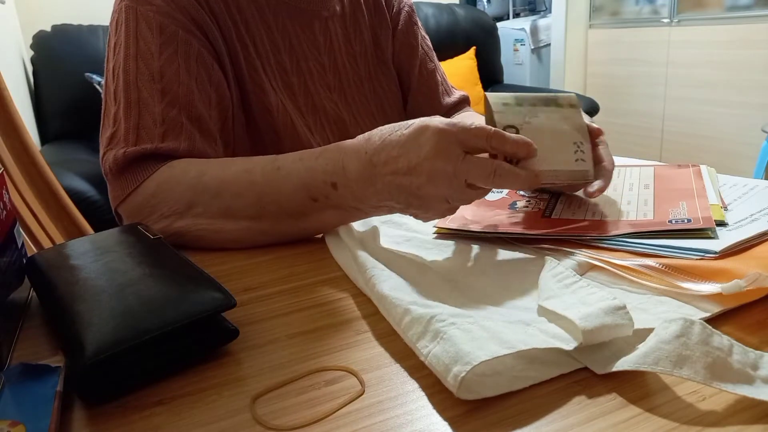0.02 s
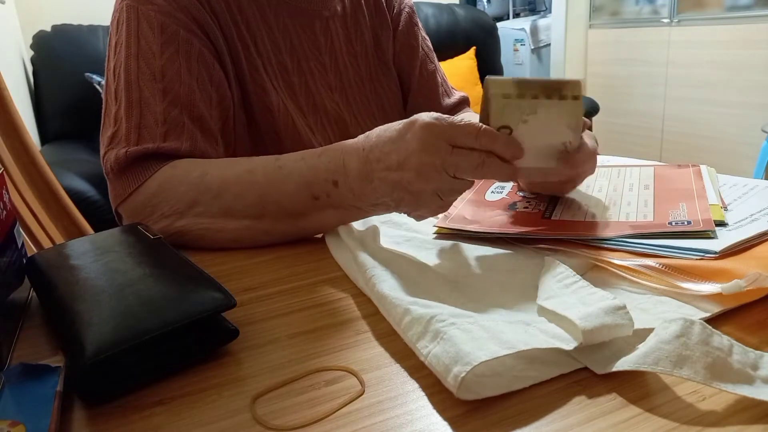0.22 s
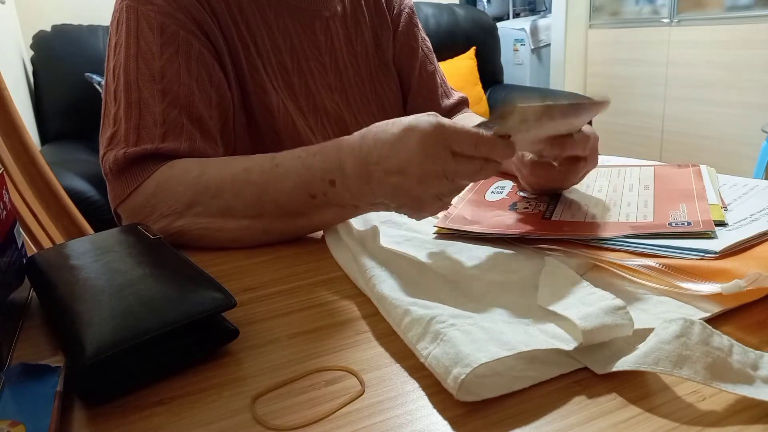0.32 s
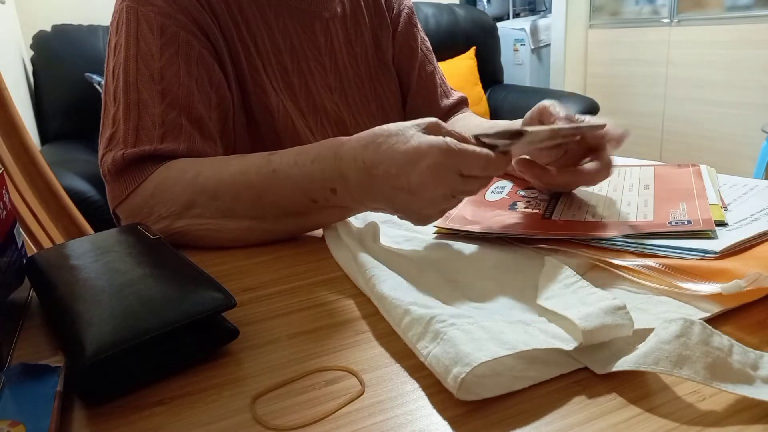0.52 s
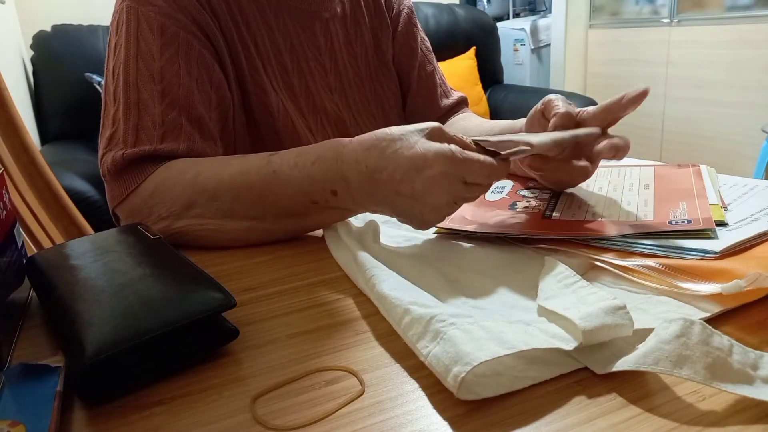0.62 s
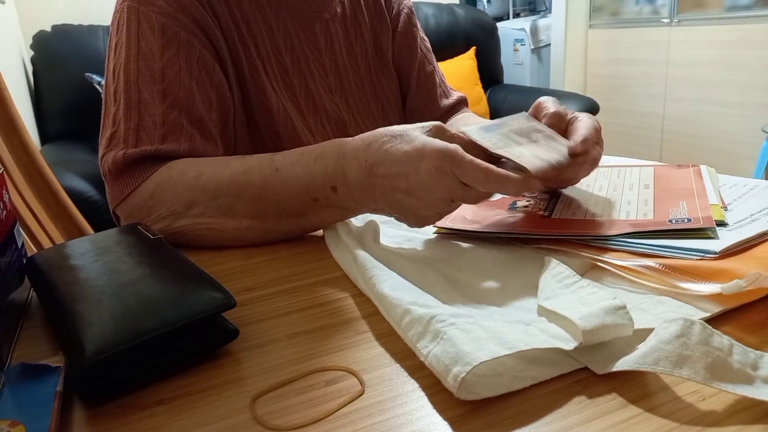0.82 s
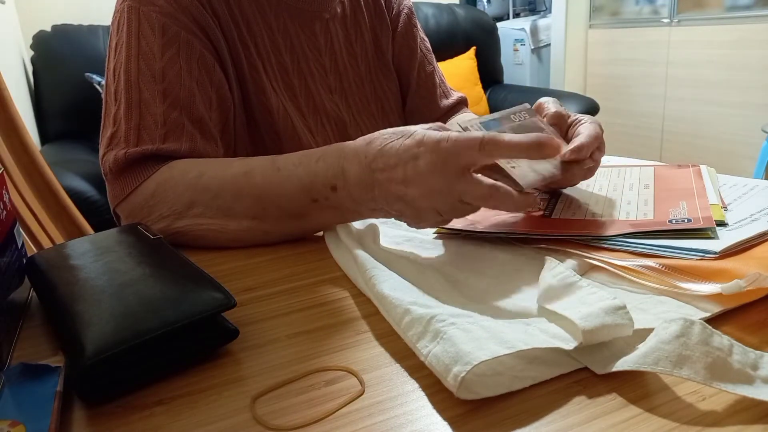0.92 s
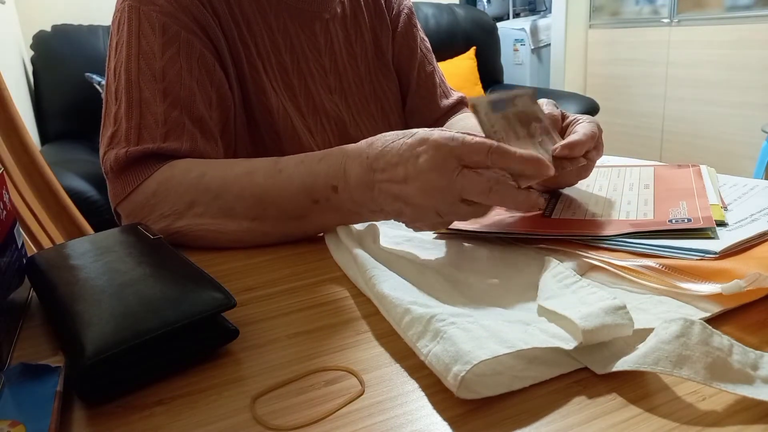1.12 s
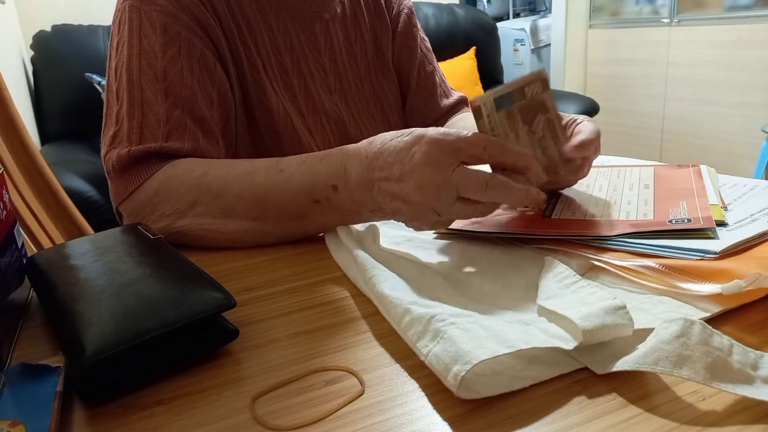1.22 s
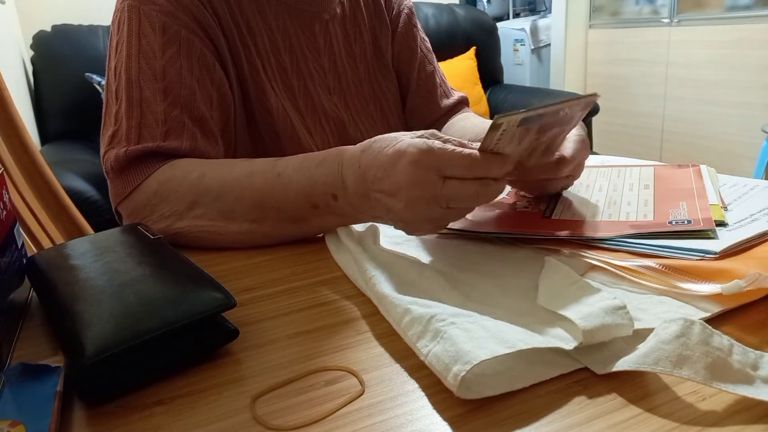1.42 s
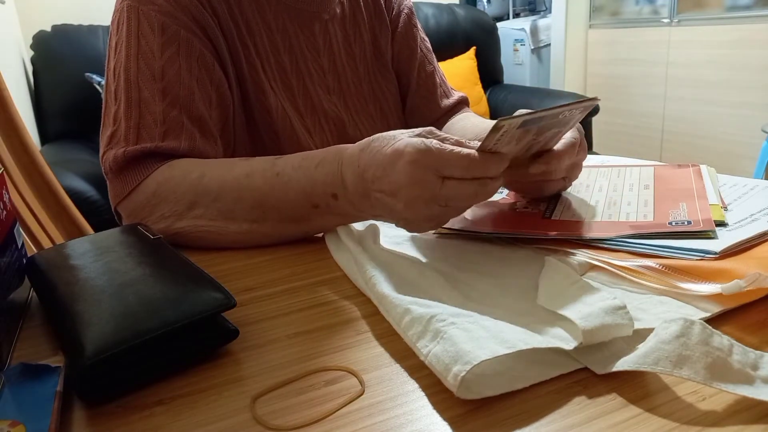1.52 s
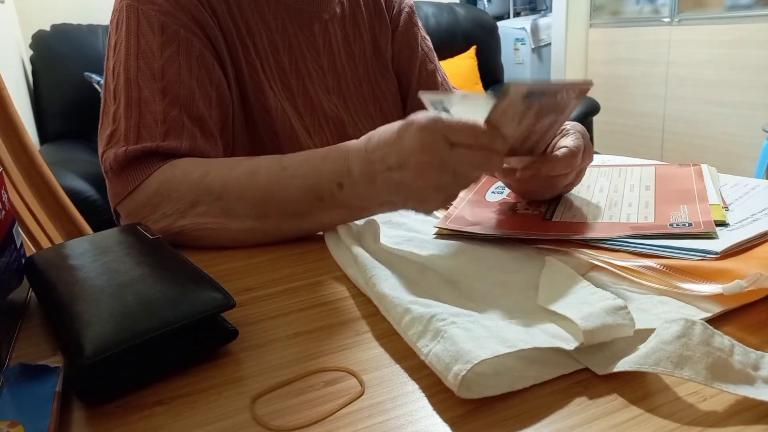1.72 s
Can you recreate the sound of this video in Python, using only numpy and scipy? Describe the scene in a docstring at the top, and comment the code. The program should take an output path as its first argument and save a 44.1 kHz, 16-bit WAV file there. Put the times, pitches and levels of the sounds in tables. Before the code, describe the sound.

Banknotes are counted by hand in a small room: light rustles and flicks, one hard snap with smaller slaps after it, then faint ticks and quiet; close stereo microphone, notes slightly left, low rumble and thin hiss.

```python
"""Banknotes are counted by hand in a small room, left of a stereo microphone, over low rumble and thin hiss.
Creases snap and slap on the wad, hardest after a third of a second: struck resonances plus torn-edge noise.
Between them notes slide with a fine crackle of random grains; the room answers with echoes and diffuse tails.
Light fingernail ticks ring and ping before the last two snaps, and the sliding dies away.
Near the end one faint whistle rises, a gliding sine on slow noise, and a narrow sizzle of noise returns."""
import sys
import numpy as np
from scipy import signal
from scipy.fft import rfft, irfft, next_fast_len
from scipy.io import wavfile
from scipy.ndimage import uniform_filter1d

SR = 44100
rng = np.random.default_rng(int(sys.argv[2]) if len(sys.argv) > 2 else 0)


def waveform_to_disk(signal):
    """Save audio, clipped to [-1, 1], as 16-bit WAV at the path in sys.argv[1]."""
    frames = np.transpose(np.atleast_2d(signal))
    scaled = np.clip(frames, -1, 1) * 32767
    samples = np.round(scaled).astype(np.int16)
    wavfile.write(sys.argv[1], SR, samples)


def ratio_of_db(decibels):
    """Turn decibels (scalar or array-like) into linear amplitude factors; 0 dB maps to 1."""
    return 10 ** (np.asarray(decibels, float) / 20)


N = 79380  # samples

# slap of the notes' flat side: (frequency [Hz], width [Hz], level [dB])
THUD_PEAKS = [(219, 140, 0), (497, 320, -2)]
CRACK_RIGHT_DB = -4  # right port against left
RING_OFFSET_DB = 9.5  # added to the ring levels of snaps and ticks
FLEX_LAG_S, TEAR_DECAY_S = .0025, .0023  # the wad flexes most this long after the edge tears


def unit(x):
    """Scale to rms 1."""
    return x / np.sqrt(np.mean(x ** 2) + 1e-20)


def along(points, hz):
    """Interpolate (frequency [Hz], value) points on a log axis."""
    point_hz, value = np.transpose(points)
    return np.interp(np.log(hz + 1), np.log(point_hz + 1), value)


def curves(rows):
    """One value per sample for each column after the time."""
    time_s, *columns = np.transpose(rows)
    return [np.interp(np.arange(N) / SR, time_s, column) for column in columns]


def filtered(x, response):
    """Multiply the spectrum of x by a complex response of frequency."""
    size = next_fast_len(x.shape[-1] + SR // 4)
    spectrum = rfft(x, size) * response(np.fft.rfftfreq(size, 1 / SR))
    return irfft(spectrum, size)[..., :x.shape[-1]]


def resonant(peaks):
    """Causal response of parallel resonances with alternating sign."""
    def response(f):
        total = 0
        for k, (centre_hz, width_hz, db) in enumerate(peaks):
            damping = 1j * f * width_hz
            total = total + (-1) ** k * ratio_of_db(db) * damping / (centre_hz ** 2 - f ** 2 + damping)
        return total
    return response


def causal(points):
    """Minimum-phase response with the given colour, by folding the cepstrum."""
    def response(f):
        cepstrum = irfft(np.log(ratio_of_db(along(points, f))))
        cepstrum[1:len(cepstrum) // 2] *= 2
        cepstrum[len(cepstrum) // 2 + 1:] = 0
        return np.exp(rfft(cepstrum))
    return response


def stereo(pair, alike, colour=((0, 0),)):
    """Two independent noises as mid and side, weighted for a left-right likeness at each frequency."""
    def response(f):
        angle = np.arccos(np.clip(along(alike, f), -1, 1)) / 2
        return ratio_of_db(along(colour, f)) * np.array([np.cos(angle), np.sin(angle)])
    mid, side = filtered(pair, response)
    return np.array([mid + side, mid - side])


def rush(colour, alike, patchy_db):
    """Stereo noise of rms 1 with time-frequency patches of random gain."""
    z = signal.stft(rng.standard_normal((2, N)), nperseg=1024)[2]
    field = uniform_filter1d(rng.standard_normal(z.shape[1:]), size=4, axis=0)
    field = uniform_filter1d(field, size=4, axis=1)
    pair = signal.istft(z * ratio_of_db(patchy_db * unit(field)), nperseg=1024)[1][:, :N]
    return unit(stereo(pair, alike, colour))


def rumble():
    """Low coloured noise whose level swells and sinks, much alike in both ports at the bottom."""
    # (time [s], level [dB])
    rumble_level = [(0, -58.5), (.07, -43.5), (.17, -52), (.23, -44), (.3, -67), (.34, -41.5), (.42, -34.5),
                    (.51, -55), (.77, -58.5), (.9, -50.5), (1.0, -55), (1.1, -53.5), (1.4, -57),
                    (1.65, -55.5), (1.8, -54.5)]
    # (frequency [Hz], relative density [dB per Hz])
    rumble_colour = [(15, -63.5), (25, -78.5), (43, -12), (52, -35), (72, -1), (118, -12), (184, -5.5),
                     (243, -9), (264, -15.5), (354, -12), (700, -36), (910, -80), (1540, -120)]
    # (frequency [Hz], left-right likeness [0..1])
    rumble_alike = [(60, 0.8), (130, 1), (290, 0.83), (640, .12)]
    return ratio_of_db(curves(rumble_level)[0]) * rush(rumble_colour, rumble_alike, patchy_db=1.5)


def hiss():
    """Steady microphone noise, almost independent in the two ports."""
    # (frequency [Hz], relative density [dB per Hz])
    hiss_colour = [(400, -7), (700, -12), (900, -4.5), (3500, -18.5), (5000, -19), (6500, -25),
                   (8500, -26.5), (14800, -18), (15400, -30.5), (15800, -47.5)]
    level_db = -78
    return ratio_of_db(level_db) * rush(hiss_colour, [(1000, .02)], patchy_db=-0.1)


def sizzle():
    """A narrow hiss that comes and goes: noise passed twice through one resonance."""
    # (time [s], relative level [dB])
    sizzle_level = [(0, -75), (.65, -78.5), (1.2, -84), (1.5, -100), (1.6, -94), (1.7, -84), (1.8, -88)]
    centre_hz, single_pass_width_hz, offset_db = 6400, 1700, 4
    narrow = resonant([(centre_hz, single_pass_width_hz, 0)])
    noise = filtered(rng.standard_normal((2, N)), lambda f: narrow(f) ** 2)
    return ratio_of_db(curves(sizzle_level)[0] + offset_db) * unit(noise)


def whistle():
    """A faint rising sine, its amplitude wavering with slow noise."""
    # (time [s], frequency [Hz], level [dB])
    whistle_glide = [(1.45, 3650, -110), (1.49, 3796, -85), (1.55, 4070, -88), (1.58, 4140, -110)]
    hz, level_db = curves(whistle_glide)
    breath = unit(uniform_filter1d(rng.standard_normal((2, N)), size=150, axis=1))
    return ratio_of_db(level_db) * breath * np.sin(2 * np.pi * np.cumsum(hz) / SR)


def room(x):
    """A dull echo 3.75 ms late colours each sound; near walls add two later dull echoes; a diffuse tail
    follows, each frequency dying at its own speed."""
    # (frequency [Hz], 60 dB decay time [s])
    decay_times = [(100, 0.68), (250, 0.61), (450, 0.58), (800, 0.27), (2500, 0.34), (6000, 0.31),
                   (14000, 0.2)]
    # (frequency [Hz], level [dB])
    tail_colour = [(100, 5), (400, -1.5), (900, -6), (1250, 5), (1800, -16.5), (2300, 4), (3300, -2.5),
                   (6300, -1.5), (14000, 0)]
    # (frequency [Hz], left-right likeness [0..1])
    tail_alike = [(60, 0.38), (150, 1), (300, 1), (600, 0.011)]
    # (delay [s], left level [dB], right level [dB]); the shortest colours the sound, the other two come from
    # near walls
    dull_echoes = [(.00375, -9, -9), (.0105, -14, -12), (.0145, -7, -13)]
    tail_db, right_db = -4.5, -0.5  # tail before colouring; right against left
    gap_s, rise_s = 0.009, 0.002
    echo_dull_hz = 6100

    hz, t, z = signal.stft(rng.standard_normal((2, SR * 3 // 4)), SR, nperseg=256)
    tail = signal.istft(z * ratio_of_db(-60 * t / along(decay_times, hz)[:, None]), SR, nperseg=256)[1]
    tail = tail * (1 - np.exp(-np.arange(tail.shape[1]) / SR / rise_s))
    tail = filtered(ratio_of_db(tail_db) * tail / np.linalg.norm(tail[0]), causal(tail_colour))
    tail = stereo(tail, tail_alike) * ratio_of_db([[0], [right_db]])
    tail = np.pad(tail, ((0, 0), (round(gap_s * SR), 0)))

    # the left port drives the tail at the rms of both
    drive = unit(x[0])[None] * np.sqrt(np.mean(x ** 2))
    wet = signal.fftconvolve(drive, tail, axes=1)[:, :N]
    dull = filtered(x, lambda f: 1 / (1 + 1j * f / echo_dull_hz))
    for delay_s, echo_left_db, echo_right_db in dull_echoes:
        echo = np.pad(dull, ((0, 0), (round(delay_s * SR), 0)))[:, :N]
        wet += ratio_of_db([[echo_left_db], [echo_right_db]]) * echo
    return wet


def paper(ring, thud, crack, air):
    """Forces on the notes sound through the wad's resonances; the right port hears them later."""
    # ring of the wad at each port: (frequency [Hz], width [Hz], level [dB])
    wad_left = [(811, 350, 0), (1317.6, 560, 5), (1584, 280, 4.5)]
    wad_right = [(713, 200, -5), (1070, 1300, -10), (1310, 780, -7.5)]
    # middle and top noise: (frequency [Hz], level [dB])
    crack_colour = [(1100, -2.5), (1500, 7), (1900, -7), (2300, 2), (3000, -2), (3700, 4.5), (4600, -6),
                    (6300, -3), (7300, -14.5), (9000, -24.5)]
    air_colour = [(2800, -11), (4500, -3.5), (6200, 1), (7200, -5.5), (8400, -11.5), (10000, -3),
                  (12000, 0.5), (13500, -9), (15000, -3), (15500, -29), (16500, -25)]
    thud_left_db, thud_right_db, air_right_db = -3, 3, -8
    right_lag_s, soft_hz = .00044, 2200

    ring = filtered(ring, lambda f: 1 / (1 + 1j * f / soft_hz) ** 2)
    thud = filtered(thud, resonant(THUD_PEAKS))
    crack = filtered(crack, causal(crack_colour))
    air = filtered(air, causal(air_colour))
    left = filtered(ring, resonant(wad_left)) + ratio_of_db(thud_left_db) * thud + crack + air
    right = filtered(ring, resonant(wad_right)) + ratio_of_db(thud_right_db) * thud
    right = right + ratio_of_db(CRACK_RIGHT_DB) * crack + ratio_of_db(air_right_db) * air
    return np.array([left, filtered(right, lambda f: np.exp(-2j * np.pi * f * right_lag_s))])


def sliding():
    """Notes slide over one another: dense tiny grains into the wad's resonances."""
    # (time [s], relative level [dB])
    slide_level = [(0, -66.5), (.04, -73.5), (.06, -51.5), (.17, -61), (.2, -40.5), (.32, -54),
                   (.35, -43.5), (.375, -51.5), (.4, -39), (.48, -53.5), (.56, -80.5), (.59, -54),
                   (.7, -83), (1.04, -73), (1.07, -65), (1.25, -103)]
    grains_per_s, grain_spread_db = 2500, 4
    offset_db, ring_db, thud_db, crack_db = -0.5, 11.5, 15.5, 1.5  # the last three against the air
    level_db, = curves(slide_level)
    hit = rng.random(N) < grains_per_s / SR
    sizes = ratio_of_db(grain_spread_db * rng.standard_normal(N))
    grains = hit * sizes * rng.choice([-1, 1], N)
    active = np.arange(N) < slide_level[-1][0] * SR
    force = ratio_of_db(level_db + offset_db) * unit(grains) * active
    return paper(ratio_of_db(ring_db) * force, ratio_of_db(thud_db) * force, ratio_of_db(crack_db) * force, force)


def ticks():
    """Light contacts of a fingernail on an edge: a clean short ring, a little crack and one narrow ping."""
    # (time [s], relative ring [dB], relative ping [dB], ping frequency [Hz])
    tick_events = [(0.8743, -46, -42, 2270), (.881, -41, -38, 2480), (.9182, -39, -45.5, 3480),
                   (0.9264, -47, -40, 3570), (1.0243, -53.5, -48, 2270)]
    ring_hz, ring_spread_s = 875, .004
    ping_s, crack_db = .0013, -4  # ping peaks at half of ping_s; crack against ping
    force, ping = np.zeros((4, N + SR)), np.zeros(N + SR)
    t = np.arange(SR // 20) / SR
    rough = rng.standard_normal((len(tick_events), len(t)))
    for (start_s, ring_db, ping_db, ping_hz), noise in zip(tick_events, rough):
        start = round(start_s * SR)
        at = slice(start, start + len(t))
        flex = np.exp(-((t - FLEX_LAG_S) / ring_spread_s) ** 2)
        force[0, at] += ratio_of_db(ring_db + RING_OFFSET_DB) * flex * np.sin(2 * np.pi * ring_hz * t)
        force[2, at] += ratio_of_db(ping_db + crack_db) * np.exp(-t / TEAR_DECAY_S) * noise
        ping_swell = t / ping_s * np.exp(1 - t / ping_s * 2)
        ping[at] += ratio_of_db(ping_db) * ping_swell * np.sin(2 * np.pi * ping_hz * t)
    return paper(*force[:, :N]) + ratio_of_db([[0], [CRACK_RIGHT_DB]]) * ping[:N]


def snaps():
    """A crease gives way: the wad flexes, lower when struck harder, as the edge tears; in three groups."""
    # (time [s], relative ring [dB], relative thud [dB], relative crack [dB], relative air [dB])
    snap_events = [(.0095, -58.5, -62, -47.5, -47.5), (.0452, -33, -40.5, -31.5, -25.5),
                   (.1295, -41, -40.5, -37.5, -48.5), (.1405, -44.5, -53.5, -57, -65.5),
                   (.182, -43.5, -54, -50, -56), (.1895, -35.5, -39.5, -26, -25.5),
                   (.203, -30.5, -62, -38, -46.5), (.2235, -31, -34.5, -38.5, -35),
                   (.2735, -39, -50, -43, -26), (.2805, -40, -38, -29, -47.5),
                   (.3052, -40, -43, -30, -46.5), (.3115, -51, -53.5, -43.5, -32),
                   (.3175, -51.5, -55, -42, -27), (.3343, -13, -17, -11, -19.5),
                   (.3797, -22, -22, -18, -25), (.4068, -27, -27, -24.5, -30.5),
                   (.4115, -32, -23.5, -21.5, -40), (.424, -23.5, -39.5, -29.5, -34),
                   (.438, -25.5, -42.5, -29.5, -40), (.5035, -43.5, -48.5, -43, -54),
                   (.5755, -39, -66.5, -35.5, -39), (.584, -51, -59, -42.5, -41),
                   (.597, -40, -63, -52, -36), (1.0437, -34, -45.5, -34, -39.5),
                   (1.0675, -54, -47, -52, -52)]
    thud_offset_db, crack_offset_db, air_offset_db = 2.5, 6.5, 2.5
    push_spread_s, shove_spread_s, roughness = .0024, .003, .55
    flex_hz, sag_hz_per_db, sag_from_db = 900, 5, -40  # flex_hz holds at sag_from_db
    force = np.zeros((3, 4, N + SR))
    t = np.arange(SR // 20) / SR
    lag = t - FLEX_LAG_S
    rough = rng.standard_normal((len(snap_events), 3, len(t)))
    for k, (start_s, ring_db, thud_db, crack_db, air_db) in enumerate(snap_events):
        hz = flex_hz - sag_hz_per_db * (ring_db - sag_from_db)
        push = np.exp(-(lag / push_spread_s) ** 2) * (np.sin(2 * np.pi * hz * t) + roughness * rough[k, 0])
        shove = np.exp(-(lag / shove_spread_s) ** 2) * np.sin(2 * np.pi * THUD_PEAKS[1][0] * lag)

        tear = np.exp(-t / TEAR_DECAY_S) * rough[k, 1:]
        tear[:, 0] = 1  # opening click
        z = rfft(tear)
        power = abs(z) ** 2
        z = z / np.sqrt(uniform_filter1d(power, size=15) / np.mean(power))  # even in colour
        tear = irfft(z, len(t)) * (t < 6 * TEAR_DECAY_S)

        gains = ratio_of_db([[ring_db + RING_OFFSET_DB], [thud_db + thud_offset_db],
                     [crack_db + crack_offset_db], [air_db + air_offset_db]])
        force[k % 3, :, round(start_s * SR):][:, :len(t)] += gains * [push, shove, *tear]
    return [paper(*group[:, :N]) for group in force]


def scene():
    """Snap groups, ticks and sliding, each with its own room tail, over the background."""
    handling = snaps() + [ticks(), sliding()]
    in_room = sum(source + room(source) for source in handling)
    return in_room + rumble() + hiss() + sizzle() + whistle()


def low_pass(x):
    """Removes everything above the highest recorded frequency."""
    return signal.sosfilt(signal.butter(12, 16600, fs=SR, output="sos"), x)


def record(dry):
    """The recorder's second-order bass cut and sharp band limit."""
    low_hz, top_hz = 48, 16500
    mix = filtered(dry, lambda f: (f < top_hz) * (1j * f / (low_hz + 1j * f)) ** 2)
    return low_pass(mix)


dry = scene()
out = record(dry)
waveform_to_disk(out)
```